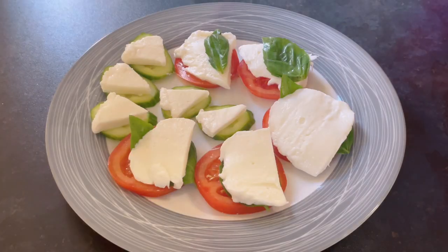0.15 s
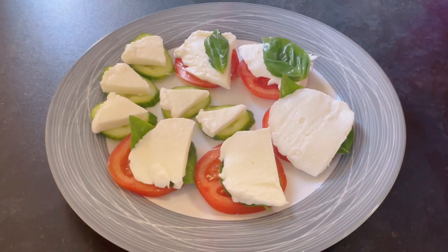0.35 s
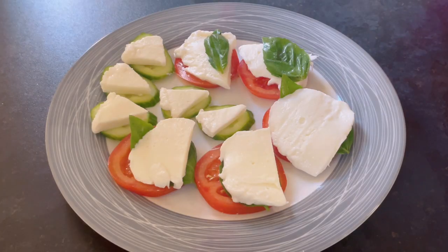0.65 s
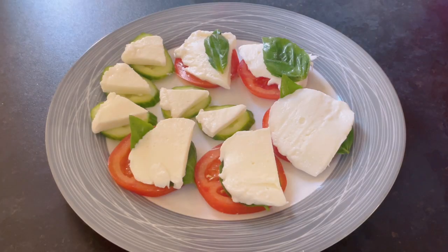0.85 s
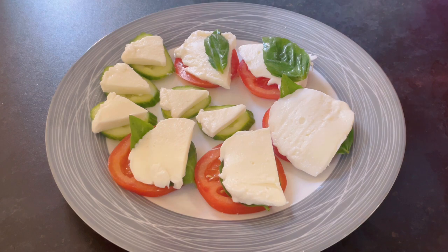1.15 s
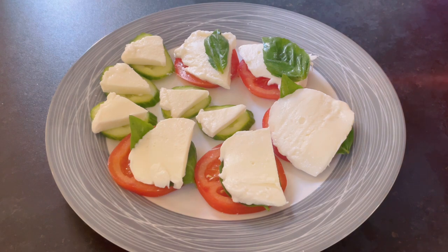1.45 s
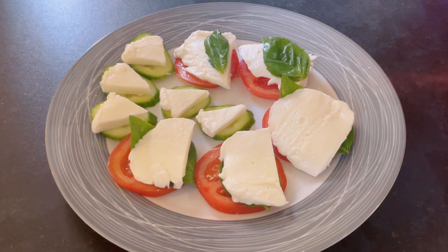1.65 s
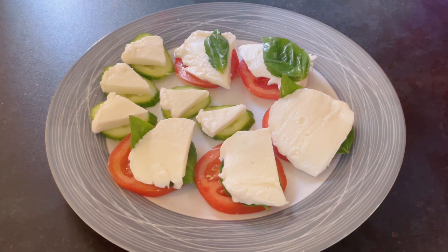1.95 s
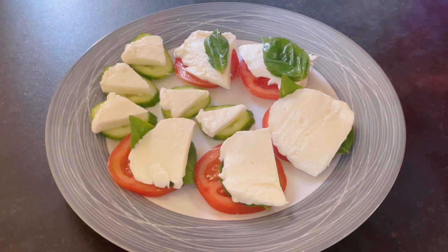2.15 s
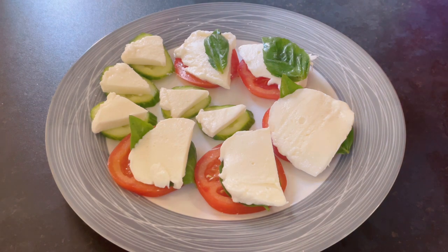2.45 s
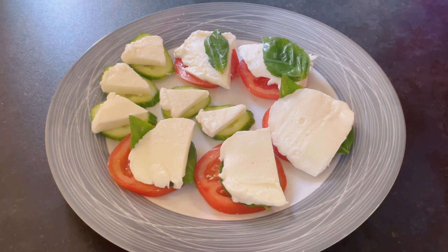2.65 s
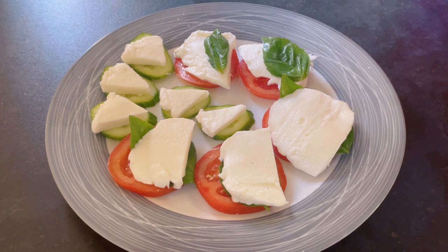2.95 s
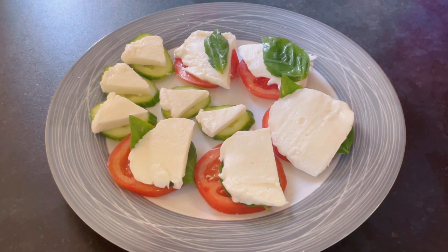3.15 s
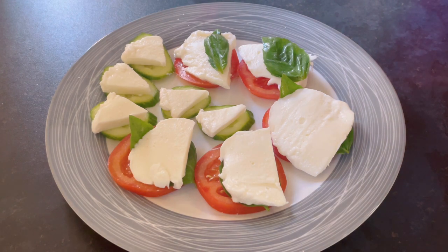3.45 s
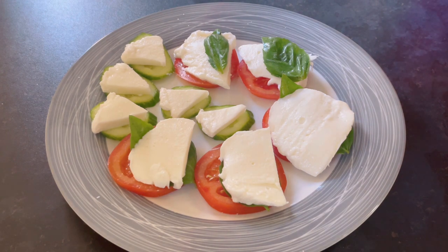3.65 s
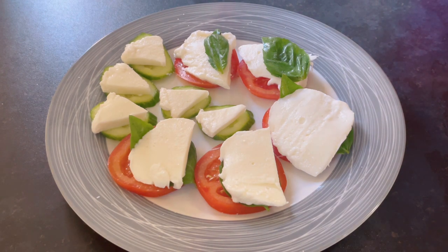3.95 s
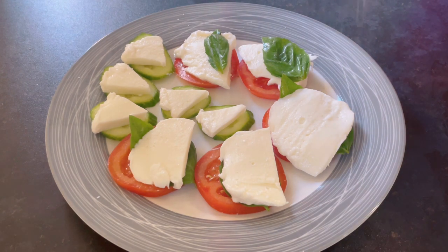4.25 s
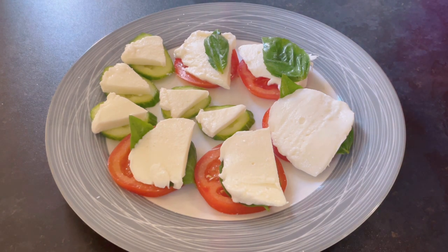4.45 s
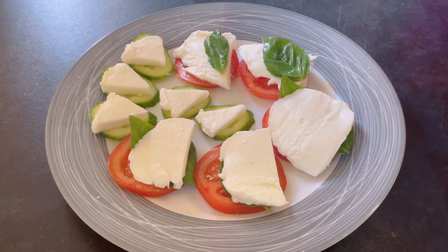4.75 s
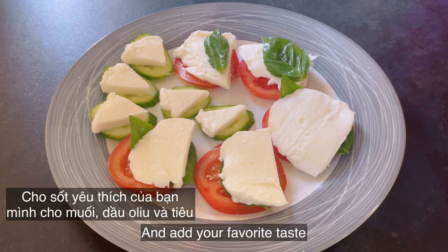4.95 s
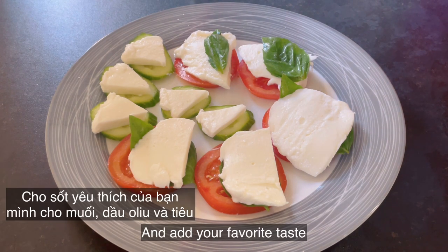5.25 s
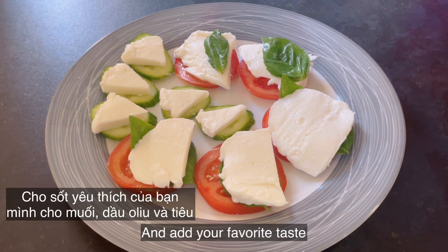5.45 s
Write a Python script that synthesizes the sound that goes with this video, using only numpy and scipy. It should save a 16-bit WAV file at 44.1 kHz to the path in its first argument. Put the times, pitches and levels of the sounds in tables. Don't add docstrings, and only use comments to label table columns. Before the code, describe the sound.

Close, dry pepper grinding: brisk crackling turns, then slower halting ones, with the mill's cap clicking between twists in a small hard room.

```python
import sys
import numpy as np
from scipy import signal
from scipy.fft import rfft, irfft
from scipy.io import wavfile

SR = 44100
rng = np.random.default_rng(int(sys.argv[2]) if len(sys.argv) > 2 else 0)


def convert_level_to_amplitude(level_db):
    exponent = np.asarray(level_db, float) / 20
    return 10 ** exponent


def file_out(sig):
    cols = np.atleast_2d(sig).T
    lim = np.clip(cols, -1, 1)
    pcm = np.round(lim * 32767).astype(np.int16)
    wavfile.write(sys.argv[1], SR, pcm)


N = 246959
TIME = np.arange(N) / SR
FFT_SIZE = 2 ** 19
HZ = np.maximum(np.arange(FFT_SIZE // 2 + 1) * SR / FFT_SIZE, 1)
NEARLY_ALIKE = np.array([[1], [.2]])


def at_hz(points, hz=HZ):
    table_hz, value = np.transpose(points)
    return np.interp(np.log(hz), np.log(np.maximum(table_hz, 1)), value)


def shaped(x, response):
    return irfft(rfft(x, FFT_SIZE) * response)[..., :N]


def colour(spectrum):
    half = FFT_SIZE // 2
    cepstrum = irfft(np.log(convert_level_to_amplitude(at_hz(spectrum))))
    cepstrum[1:half] *= 2
    cepstrum[half + 1:] = 0
    response = np.exp(rfft(cepstrum))
    return response / np.sqrt(np.mean(abs(response) ** 2))


def band(x, low_hz, high_hz):
    return signal.sosfilt(signal.butter(2, [low_hz, high_hz], "band", fs=SR, output="sos"), x)


def clicks_at(times, sizes):
    out = np.zeros(N)
    places = (np.asarray(times).ravel() * SR).astype(int)
    np.add.at(out, np.minimum(places, N - 1), sizes)
    return out


def swell(clicks, rise_s, fall_s):
    a, b = np.exp(-1 / (rise_s * SR)), np.exp(-1 / (fall_s * SR))
    return signal.lfilter([2 * (1 - a)], [1, -a - b, a * b], clicks + 1e-18)


def ring(clicks, hz, t60):
    r, w = convert_level_to_amplitude(-60 / (t60 * SR)), 2 * np.pi * hz / SR
    return signal.lfilter([0, np.sin(w)], [1, -2 * r * np.cos(w), r * r], clicks + 1e-18)


def lumps(per_s):
    knots = rng.standard_normal(int(per_s * N / SR) + 2)
    return np.interp(TIME * per_s, np.arange(len(knots)), knots)


def noise_pair():
    return rng.standard_normal((2, N))


# pitch_hz, level_db (per Hz)
AIR = [(30, -36), (45, -13), (90, -9), (170, -18), (420, -10.5), (520, -20.5), (1000, -31), (2500, -39),
       (6000, -27), (9000, -27.5), (12700, -24), (15500, -45)]
AIR_DB = -80.5


def air():
    return convert_level_to_amplitude(AIR_DB) * shaped(noise_pair(), colour(AIR))


# pitch_hz, level_db (per Hz)
MILL = [(500, -36), (750, -27.5), (1200, -16.5), (2400, -10), (3500, -5.5), (4100, -9), (5000, -3.5),
        (8000, 2.5), (9500, 5.5), (11500, -7.5), (12500, -6), (14000, -14), (15600, -19.5), (16300, -62)]


def through_mill(x):
    return shaped(x, colour(MILL))


# pitch_hz, t60_s
KITCHEN = [(300, 0.28), (800, 0.33), (1300, 0.36), (2100, 0.5), (5500, 0.36), (9000, 0.25), (14600, 0.43)]


def kitchen(x, wet_db=-10, early_db=-15, early_t60=0.14):
    noise = through_mill(rng.standard_normal((2, 2, N)))
    edges = 350 * np.sqrt(2) ** np.arange(13)
    out = 0
    for k, (low, high) in enumerate(zip(edges, np.minimum(edges[1:], 20000))):
        energy = np.pad(band(x[0], low, high) ** 2, (150, 0))[:N]
        slow, quick = convert_level_to_amplitude(-120 / SR / np.array([at_hz(KITCHEN, low), early_t60]))
        stored = convert_level_to_amplitude(2 * wet_db) * signal.lfilter([1 - slow], [1, -slow], energy)
        stored += convert_level_to_amplitude(2 * early_db) * signal.lfilter([1 - quick], [1, -quick], energy)
        fresh = band(noise[k % 2], low, high)
        out = out + fresh / fresh.std() * np.sqrt(stored)
    return out


# start_s, level_db (peak)
LEANS = [
    (1.149, -59),
    (1.245, -72),
]
TABLE_HZ = 81


def table():
    s, db = np.transpose(LEANS)
    push = swell(clicks_at(s, convert_level_to_amplitude(db)), rise_s=0.012, fall_s=0.022)
    return push * np.sin(2 * np.pi * TABLE_HZ * TIME) * NEARLY_ALIKE


# start_s, level_db (rumble)
TURN = [(0, -66), (.45, -77), (1.15, -69.5), (1.29, -85), (1.93, -85.5), (2.25, -72), (2.42, -76),
        (2.6, -69.5), (2.9, -68), (3.1, -65.5), (3.45, -74), (3.6, -65.5), (4.2, -70.5), (4.45, -74.5),
        (5.6, -71)]
# pitch_hz, level_db (per Hz)
GRIP = [(18, -21), (30, -9.5), (75, 0), (114, -0.5), (152, 0.5), (313, -4.5), (402, -6), (700, -20),
        (910, -32.5), (1540, -120)]
# start_s, level_db (peak), pitch_hz
THUDS = [(0.157, -54.5, 167), (0.296, -51, 155), (0.954, -54, 136), (1.443, -64, 184), (2.046, -55, 262),
         (2.519, -60.5, 146), (2.678, -53.5, 266), (3.185, -47.5, 164), (3.764, -60, 242),
         (4.099, -54.5, 86), (4.556, -53.5, 106), (5.104, -51.5, 193), (5.385, -56.5, 175),
         (5.55, -47, 180)]
TREMOR_DB = 4
JERK_SHAKE_DB, JERK_SETTLE_S = -8, 0.035


def grip():
    starts, levels, _ = np.transpose(THUDS)
    effort = convert_level_to_amplitude(np.interp(TIME, *np.transpose(TURN)) - 7 + TREMOR_DB * lumps(12))
    jerks = clicks_at(starts, convert_level_to_amplitude(levels + JERK_SHAKE_DB - 9))
    effort = effort + swell(jerks, rise_s=0.018, fall_s=JERK_SETTLE_S)
    out = shaped(noise_pair() * effort, colour(GRIP))
    for s, db, hz in THUDS:
        swing = np.sin(2 * np.pi * hz * (TIME - s))
        push = swell(clicks_at(s, convert_level_to_amplitude(db - 8)), rise_s=.5 / hz, fall_s=1.6 / hz)
        out = out + push * swing * NEARLY_ALIKE
    puff = swell(clicks_at(starts, convert_level_to_amplitude(levels + 5.5)), rise_s=0.0024, fall_s=0.01)
    return out + band(puff * noise_pair(), 87, 720)


# start_s, level_db, length_s, pitch_hz
SCUFFS = [
    (0.667, -74, 0.018, 850),
    (1.12, -57.5, 0.025, 410),
    (1.686, -72.5, 0.019, 860),
    (4.676, -64.5, 0.025, 806),
]


def scuffs():
    skin = noise_pair()
    out = 0
    for s, db, length, hz in SCUFFS:
        slide = swell(clicks_at(s, convert_level_to_amplitude(db + 11.5)), rise_s=0.032, fall_s=length)
        out = out + band(slide * skin, hz / 1.4, hz * 1.63)
    return out


# start_s, level_db (peak)
TICKS = [
    (.6922, -51),
    (1.7649, -58),
    (2.342, -62),
    (2.435, -69),
]
# pitch_hz, level_db, t60_s
METAL = [(2800, -4, .1), (3690, -6, .08), (4622, -1, .08), (5645, -2, .12), (8020, 0, .1), (9372, -6, .08),
         (10830, -3, .07), (12370, -1, .1), (14000, -4, .12)]


def ticks(strike_db=-13):
    s, peak_db = np.transpose(TICKS)
    out = 0
    for hz, db, t60 in METAL:
        uneven_db = rng.normal(0, 2.5, len(s))
        strikes = clicks_at(s, convert_level_to_amplitude(peak_db + db + strike_db + uneven_db))
        out = out + ring(strikes, hz, 1.3 * t60) * NEARLY_ALIKE
    return out


# start_s, level_db, top_mode_db
KNOCKS = [
    (0.6593, -41, -21.5),
    (1.9037, -40.5, -28),
    (1.9755, -58, -30),
    (2.9131, -37.5, -14.5),
    (2.939, -42, -20.5),
    (4.9098, -32, -30),
]
# pitch_hz, level_db, t60_s
CAP = [(820, -22, .01), (1300, -15, .005), (2400, -9, .004), (3300, -11, .004), (4200, -13, .004),
       (5100, -14, .004), (6400, -4, .007), (7200, -4, .005), (8700, -6, .005), (10800, -16, .004)]
CAP_TOP_HZ = 13620


def knocks():
    s, db, top_db = np.transpose(KNOCKS)
    ragged = noise_pair()

    def tap(level_db):
        after_touch = swell(clicks_at(s, convert_level_to_amplitude(level_db - 15)), rise_s=0.0006, fall_s=0.0016) * ragged
        return after_touch + clicks_at(s + .0004, convert_level_to_amplitude(level_db - 4)) * [[1], [.3]]

    body = 0
    for k, (hz, mode_db, t60) in enumerate(CAP):
        body = body + ring(tap(db + mode_db), hz, t60) * (-1) ** k
    top = ring(tap(db + top_db - 1), CAP_TOP_HZ, t60=0.06)
    return band(body, 860, 7500) + band(top, 11000, 14500)


# start_s, length_s, start_level_db, end_level_db
STROKES = [(0, 0.056, -32.5, -56), (0.147, 0.13, -40, -48.5), (0.308, 0.081, -35.5, -58),
           (0.476, 0.25, -63.5, -71), (0.792, 0.1, -44.5, -61), (0.938, 0.14, -43, -40.5),
           (1.152, 0.16, -70, -60.5), (1.43, 0.32, -47, -70.5), (1.818, 0.079, -74, -75),
           (2.023, 0.093, -37.5, -41.5), (2.48, 0.13, -46.5, -54), (2.685, 0.036, -63, -50),
           (3.082, 0.17, -53.5, -50), (3.53, 0.18, -52, -64), (4.047, 0.07, -54, -51),
           (4.547, 0.054, -56, -62), (4.755, 0.14, -79, -69.5), (5.061, 0.12, -59, -51),
           (5.374, 0.19, -56.5, -48)]
BITE_S, LET_GO_S = 0.0012, 0.0069


def crunch(per_s=2500, spread_db=3.0):
    moving = np.zeros(N)
    for s, length, start_db, end_db in STROKES:
        corners = [s - BITE_S, s, s + length, s + length + LET_GO_S]
        moving += np.interp(TIME, corners, [0, convert_level_to_amplitude(start_db), convert_level_to_amplitude(end_db), 0])
    clump_sizes = (rng.random(N) < 250 / SR) * rng.exponential(1, N)
    clumps = swell(clump_sizes, rise_s=.0008, fall_s=.002)
    grain_sizes = (rng.random(N) < per_s / SR) * convert_level_to_amplitude(spread_db * rng.standard_normal(N))
    grains = grain_sizes * noise_pair()
    powder = through_mill((grains + .3 * noise_pair()) * (1.2 + clumps))
    return moving * powder / powder.std()


# start_s, level_db (peak), pitch_hz
SHELLS = [(0.179, -19, 6940), (0.1898, -17.5, 6290), (0.7942, -20, 5880), (0.817, -15.5, 5860),
          (0.9527, -8, 6060), (0.976, -23, 7390), (2.0385, -21.5, 7160), (2.6842, -11, 5120),
          (3.1367, -23.5, 5710), (3.189, -16.5, 3300), (3.765, -24, 5100), (4.085, -22, 5840),
          (4.564, -9.5, 5500), (5.1057, -15, 6350), (5.493, -15.5, 6960), (5.5582, -12, 7060)]
# start_s, level_db (peak), pitch_hz
HUSKS = [(0.0695, -28, 3240), (0.152, -26, 3590), (0.2997, -22, 2760), (2.0283, -28, 2420),
         (2.1293, -27, 4910), (2.5602, -30, 5000), (2.7155, -30, 5270), (3.0941, -26, 7090),
         (3.139, -30, 3000), (3.2312, -30, 2930), (3.2908, -27, 5410), (3.8837, -30, 6360),
         (4.0689, -25, 5290), (4.21, -28, 6820), (4.337, -40, 5400), (4.5645, -20, 6850),
         (5.1052, -25, 3500), (5.3849, -26, 6890), (5.5316, -25, 7930)]
SHELL_DB, HUSK_DB, SHELL_CYCLES = -7.5, -6, 24


def shells():
    pieces = [(s, db + SHELL_DB, hz) for s, db, hz in SHELLS]
    pieces += [(s, db + HUSK_DB, hz) for s, db, hz in HUSKS]
    out = 0
    aside = noise_pair() * [[0], [.5]] + [[1], [0]]
    for s, db, hz in pieces:
        strikes = clicks_at([s, s + 3 / hz], convert_level_to_amplitude([db - 5, db]))
        out = out + ring(strikes * aside, hz, SHELL_CYCLES / hz)
    return band(out, 1500, 11000)


# start_s, level_db (peak), body_share_db, top_share_db
BURSTS = [(0.038, -25.0, -13.5, -4), (0.0695, -25, -5, 2), (0.152, -24, -6, -2), (0.1646, -21, -15, 0.5),
          (0.1781, -15, -15.5, -12), (0.1896, -16.5, -17.5, -11.5), (0.2997, -15, -10.5, -6.5),
          (0.7939, -22.5, -17.5, -11), (0.941, -19, -8.5, -1.5), (0.9514, -11.5, -14, -7),
          (0.9616, -16.5, -12, -4.5), (0.9759, -13.5, -14.5, -7.0), (1.0053, -22, -22, -6),
          (1.062, -25.5, -21, -3), (1.4485, -20.5, -13.5, 0), (1.5003, -23.5, -23, 0.5),
          (1.6087, -22, -12, -0.5), (2.0283, -17.5, -14.5, 0.5), (2.039, -21, -13, -7.0),
          (2.0436, -22, -11, -0.5), (2.0551, -15.5, -14, -9.5), (2.0783, -19, -13.5, 0),
          (2.1293, -20.5, -10.5, -6.5), (2.5602, -22.5, -10.5, -3.5), (2.6829, -13, -12, -9.5),
          (2.7151, -24.0, -9, -1), (3.0941, -21.5, -15.5, -4), (3.1379, -25, -5.5, -1),
          (3.1888, -17.5, -8.5, -1.5), (3.2312, -21, -8, 1.5), (3.2908, -21.5, -8.0, 1),
          (3.6927, -27.5, -6, -4.5), (3.7659, -24.5, -3, -2.5), (3.8837, -25.0, -16, -7.0),
          (4.0689, -19.5, -9.5, -8.5), (4.0827, -19, -14, -4), (4.0956, -22.0, -8, -1),
          (4.1073, -24.5, -4.5, -2), (4.21, -19.5, -12, -5.5), (4.5533, -14.5, -15.5, -12),
          (4.5644, -16, -17, -8), (4.5855, -24.0, -6, -10.5), (5.1051, -21.0, -8.5, 2.5),
          (5.3849, -19, -15.5, -5.5), (5.4046, -17, -15, -8), (5.4929, -16.5, -14.5, -7),
          (5.5316, -17.5, -10, -11), (5.5581, -18, -15, -3)]
# start_s, level_db (peak), body_share_db, top_share_db
DOUBLES = [
    (.298, -16.5, -12.5, 0.5),
    (1.501, -27.5, -14, -0.5),
    (2.0265, -20, -12.5, -2.5),
    (2.6845, -20, -16.5, -7.5),
    (3.1905, -25, -3, -6.5),
    (3.2353, -29, -12, -2),
    (4.066, -23, -11, -10),
    (5.194, -30, -15.5, -1),
]
# start_s, level_db
# (peak), body_share_db
SPLITS = [(0.013, -28, -8.0), (0.0502, -36.0, -7), (0.0624, -36.0, -9), (0.1308, -42.0, -5.0),
          (0.1589, -23, -20), (0.2, -32, -7), (0.2055, -28, -7.5), (0.2197, -27, -5.5),
          (0.242, -36.0, -16), (0.255, -33, -8), (0.2618, -42, -4), (0.29, -26, -22),
          (0.3198, -27.5, -8.5), (0.3295, -25, -7), (0.3436, -26, -7), (0.3544, -26.5, -9.5),
          (0.3866, -42, -10.0), (0.399, -47.5, -1.5), (0.7968, -32, -12.0), (0.8176, -33, -7),
          (0.8248, -32, -5), (0.8304, -30, -11.5), (0.9989, -34, -9), (1.0105, -35, -13),
          (1.0188, -34, -9), (1.0367, -27.5, -15), (1.0538, -25, -15), (1.058, -28.0, -17),
          (1.077, -37, -11.0), (1.0861, -34.5, -11.5), (1.1592, -40.5, -10.5), (1.1773, -47.5, -7),
          (1.1808, -54, -10.0), (1.1887, -50, -6), (1.2458, -47, -12.0), (1.254, -47, -9),
          (1.4308, -43, -17), (1.4378, -25.5, -14), (1.443, -26.5, -8.5), (1.4567, -27.5, -9),
          (1.4702, -31, -9), (1.4799, -31, -12.5), (1.5076, -37.5, -3), (1.531, -43, -9),
          (1.5492, -33.5, -4.0), (1.5549, -31.0, -13), (1.5656, -46, -8), (1.5775, -45, -11.0),
          (1.583, -36.0, -12), (1.6164, -38.0, -14), (1.6231, -43, -7.0),
          (2.0653, -26, -7), (2.072, -25.5, -9.5), (2.0925, -21.5, -11), (2.102, -41, -10),
                 (2.115, -37.5, -2.5), (2.134, -33, -16), (2.1376, -26.5, -7.5), (2.1657, -46, -11.0),
                 (2.232, -46, -10), (2.4811, -28, -15), (2.489, -50, -7.5), (2.508, -44.5, -10),
                 (2.5162, -22.5, -12), (2.5246, -24.5, -8.5), (2.5654, -28, -7.5), (2.582, -35, -11),
                 (2.6016, -35, -12.5), (2.6802, -24, -16.5), (2.6938, -31, -13), (2.7104, -30, -9),
                 (2.7415, -47, -8), (3.0553, -48.5, -13), (3.1006, -26.5, -10.5), (3.1126, -35, -13),
                 (3.1171, -29.5, -14.5), (3.125, -32.5, -12.5), (3.1289, -33.0, -10.5),
                 (3.1457, -39, -14.5), (3.1513, -42, -9), (3.1538, -42, -11.5), (3.1597, -32.0, -10.5),
                 (3.1654, -28, -8), (3.1965, -33.5, -7.5), (3.2086, -30, -8.5), (3.2734, -40.0, -13),
                 (3.2823, -36.5, -9), (3.296, -34, -10.0), (3.308, -32.5, -11), (3.3272, -44, -9),
                 (3.5332, -55, -13), (3.5399, -38, -7.0), (3.5536, -41.5, -3.5), (3.56, -35, -9.5),
                 (3.566, -41, -7), (3.5749, -44, -7), (3.5837, -30, -8.0), (3.6014, -25.5, -9),
                 (3.6072, -34.0, -9), (3.6102, -28, -13), (3.6229, -25.5, -13), (3.6305, -48, -11.0),
                 (3.6707, -26, -10.0), (3.6867, -30.5, -4.0), (3.69, -30.5, -17), (3.707, -43, -11.0),
          (3.7307, -31, -19), (3.7377, -28.5, -8), (3.761, -38, -12.0), (3.7731, -34, -12),
                  (3.778, -41, -12.0), (3.7881, -24.5, -15), (3.7941, -31.5, -10.5), (3.8027, -38, -7),
                  (3.8467, -41, -15.0), (3.8525, -32, -12.5), (3.8913, -45, -16), (3.9181, -28, -16.5),
                  (3.9274, -50, -15), (3.9345, -48.5, -11), (3.9438, -29.5, -6), (3.9534, -33, 1.0),
                  (3.979, -56, -9), (3.9937, -40.0, -9), (4.0167, -44.5, -11), (4.0586, -44.0, -11.0),
                  (4.0774, -23.5, -14.0), (4.121, -36, -6), (4.1415, -41, -9), (4.152, -44.5, -8),
                  (4.179, -45.5, -8), (4.1927, -31.5, -10.5), (4.2366, -33.0, -13), (4.3367, -32, -16.5),
                  (4.3848, -38.5, -12.5), (4.3883, -39, -19), (4.451, -45.5, -10.5), (4.572, -32.0, -9),
                  (4.6136, -39.5, -3), (5.0734, -37.0, -19), (5.0826, -41.0, -13.5), (5.0869, -30.5, -15),
                  (5.0952, -41, -6), (5.131, -32.5, -5), (5.1439, -36, -10), (5.1522, -31, -10.5),
                  (5.1595, -41.0, -7.0), (5.1653, -35, -6), (5.171, -33.5, -12), (5.18, -42, -15.0),
                  (5.1858, -40, -8), (5.1969, -26.5, -15), (5.2184, -44, -12), (5.339, -50.0, -10),
                  (5.3925, -32, -11), (5.3962, -31, -11), (5.4134, -29, -14.0), (5.4208, -30.5, -11),
                  (5.4527, -46, -11.0), (5.466, -43.0, -12.0), (5.4832, -39, -8), (5.522, -24, -10),
                  (5.5486, -38, -5)]
# start_s, level_db (peak)
CRUMBS = [(0.4799, -54), (0.4976, -51.0), (0.5058, -51.5), (0.538, -50.5), (0.5445, -52), (0.5565, -50),
          (0.5645, -54), (0.5706, -51), (0.575, -54.0), (0.5806, -54.0), (0.593, -51), (0.5996, -57),
          (0.6237, -61), (0.6322, -61), (0.6438, -50.5), (1.2012, -53.5), (1.2077, -51.0), (1.2128, -50),
          (1.262, -48), (1.27, -50), (1.2844, -54), (1.291, -56.0), (1.3061, -63), (1.3124, -62),
          (1.6998, -57), (1.8593, -61), (1.8694, -68.0), (1.937, -63.0), (2.278, -54), (2.8977, -58),
          (2.99, -54), (3.0694, -61), (3.076, -60.0), (3.0808, -56), (3.3862, -62), (3.472, -67),
          (3.5189, -64), (3.5222, -53), (4.0031, -50.0), (4.0336, -58), (4.28, -53.0), (4.3136, -55.0),
          (4.3516, -54), (4.415, -51), (4.4448, -50), (4.4658, -57), (4.5149, -69), (4.5267, -70),
          (4.7746, -62.0), (4.805, -58), (4.8233, -68), (4.8485, -64.5), (4.8622, -66), (4.879, -70),
          (4.9923, -70), (5.007, -71.0), (5.0621, -51), (5.2963, -65), (5.3252, -61.0)]
SPLIT_TOP_DB, TOP_FOLLOWS_BODY, CRUMB_BODY_DB, CRUMB_TOP_DB = 2, 0.32, -12.5, -1.5


def fracture_rows():
    splits = [(s, db, body, SPLIT_TOP_DB + TOP_FOLLOWS_BODY * body)
              for s, db, body in SPLITS]
    crumbs = [(s, db, CRUMB_BODY_DB, CRUMB_TOP_DB) for s, db in CRUMBS]
    return BURSTS + DOUBLES + splits + crumbs


CHAMBER_HZ, RATTLE_DB, SNAP_DB = 4780, -14, -3.5
RATTLE_UNTIL_S = 1.4


def cracks(spread_db=3.5):
    s, peak_db, body_db, top_db = np.transpose(fracture_rows())
    uneven_db = spread_db * np.clip(rng.standard_normal(N), -3, 1.6) - 3.8
    fractures = noise_pair() * convert_level_to_amplitude(uneven_db)
    creak_db = rng.uniform(24, 40, len(s))

    def rush(db, fall_s):
        creak = clicks_at(np.maximum(s - .0032, 0), convert_level_to_amplitude(db - creak_db))
        failure = swell(clicks_at(s, convert_level_to_amplitude(db)) + creak, rise_s=0.0013, fall_s=fall_s)
        snap = swell(clicks_at(s, convert_level_to_amplitude(db + SNAP_DB)), rise_s=0.0004, fall_s=0.00023)
        return (failure + snap) * fractures

    out = band(rush(peak_db + body_db + 15.3, 0.00078), 300, 5020)
    out += band(rush(peak_db + 5.0, 0.0005), 3430, 9570)
    out += band(rush(peak_db + top_db + 12.5, 0.00068), 12100, 16940)
    light_db = np.where(peak_db < -46, np.where(s < RATTLE_UNTIL_S, 0, -9), -60)
    rattle = ring(rush(peak_db + light_db + RATTLE_DB, .0007), CHAMBER_HZ, t60=.006)
    return through_mill(out) + band(rattle, 2900, 8700)


def scene():
    mill = cracks() + crunch() + knocks() + scuffs() + shells()
    return mill + kitchen(mill) + ticks() + grip() + table() + air()


def roll_off(x):
    return signal.sosfilt(signal.butter(12, 16650, fs=SR, output="sos"), x)


# pitch_hz, left_lead_rad
PORT_TURN = [(0, 0), (900, .45), (1900, 0), (3600, .65), (4300, .35), (5100, .6), (5750, -1.55),
             (6900, -.8), (7600, -2.3), (8300, -2.8), (9450, -3.5), (10200, -4.1), (13000, -6.1),
             (14000, -6.28)]
# pitch_hz, level_db
PORT_OWN = [(100, -13), (450, -9), (750, -4), (1200, -10), (2000, -17), (5500, -11), (7900, -14),
            (8500, -26), (9300, -25), (9800, -15), (11500, -8), (13000, -14), (14200, -15), (16000, -15)]
MIC_DB = 4


def record(dry):
    dry = band(dry, 25, 21000)
    own = shaped(dry[1], convert_level_to_amplitude(at_hz(PORT_OWN)))
    turn = np.exp(.5j * np.interp(HZ, *np.transpose(PORT_TURN)))
    left = convert_level_to_amplitude(MIC_DB + .25) * shaped(dry[0] + own, turn)
    right = convert_level_to_amplitude(MIC_DB - .25) * shaped(dry[0] - own, turn.conj())
    return roll_off(np.array([left, right]))


dry = scene()
out = record(dry)
file_out(out)
```